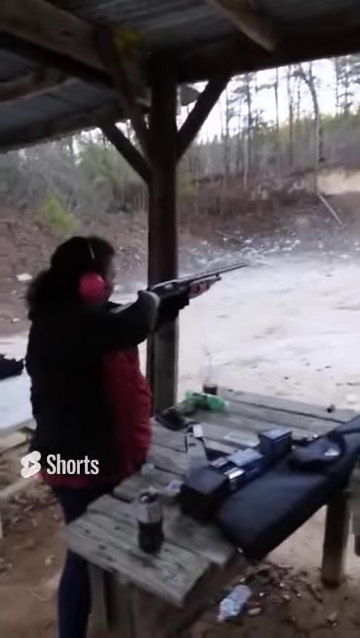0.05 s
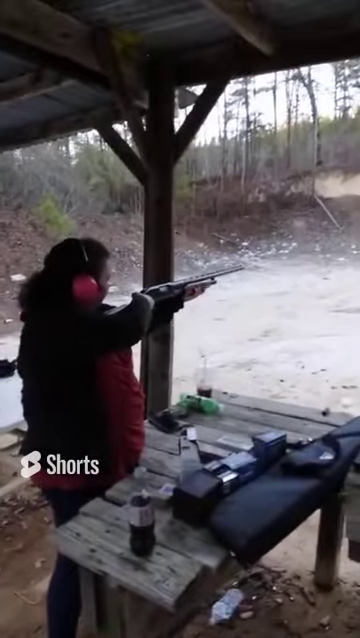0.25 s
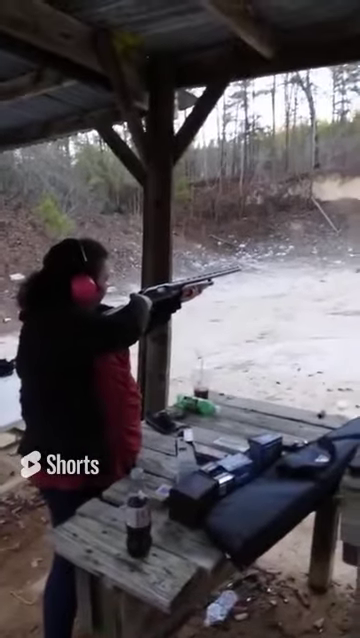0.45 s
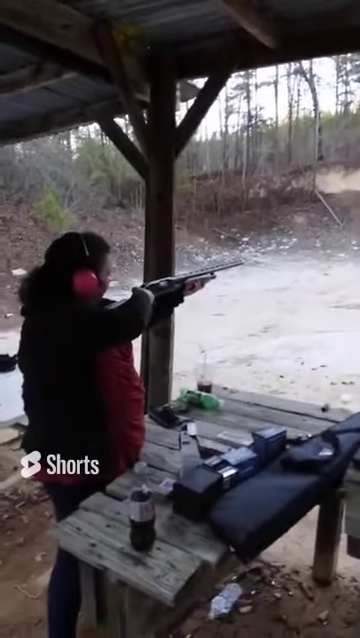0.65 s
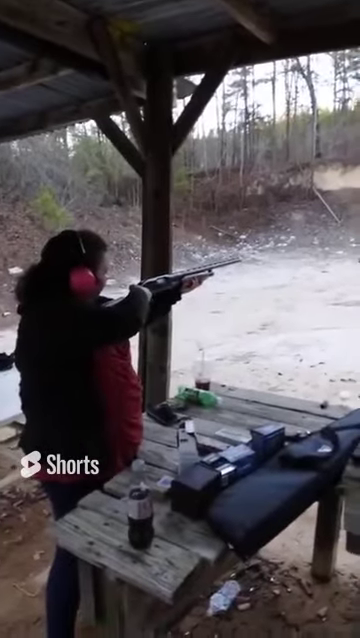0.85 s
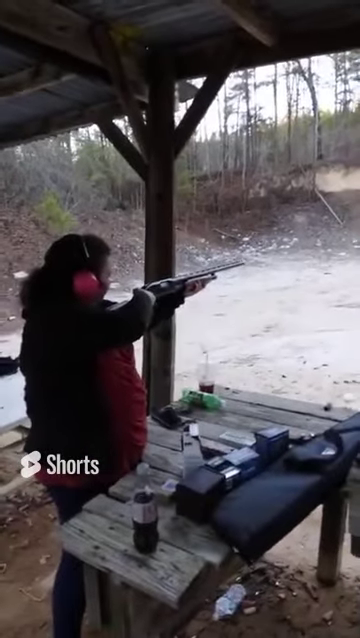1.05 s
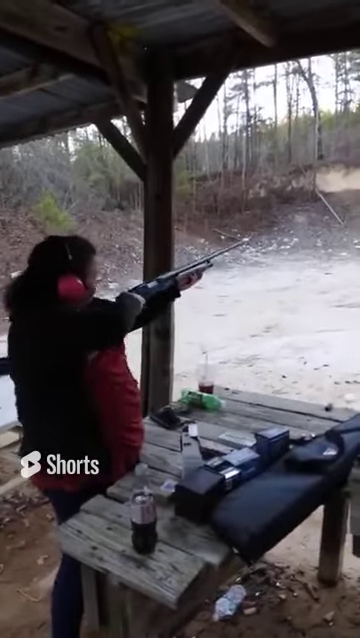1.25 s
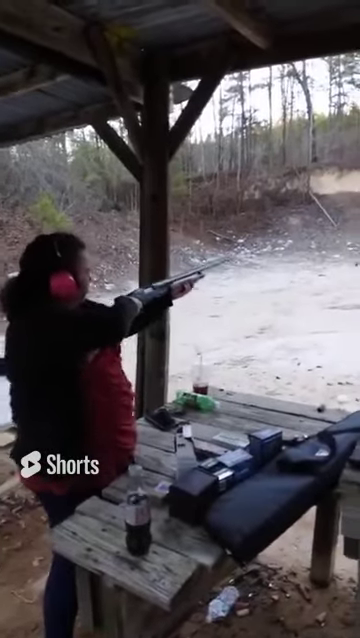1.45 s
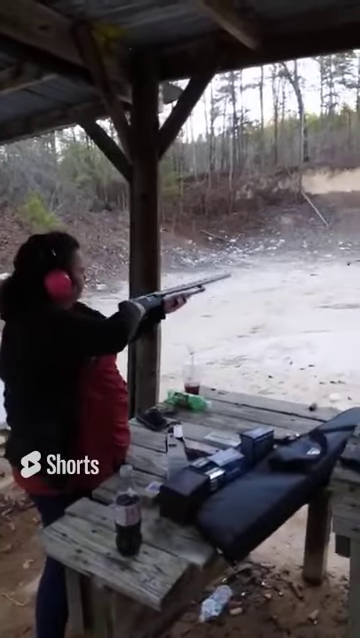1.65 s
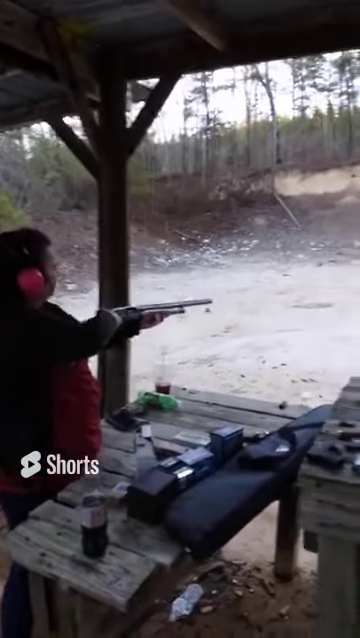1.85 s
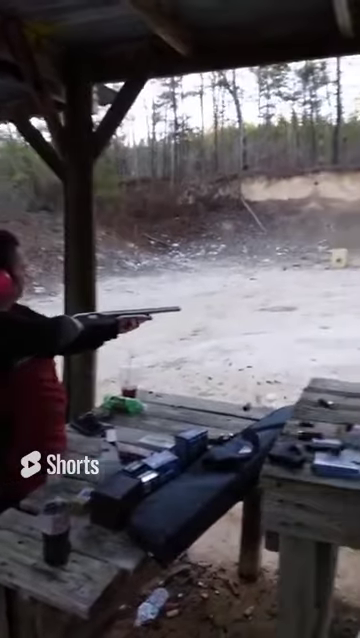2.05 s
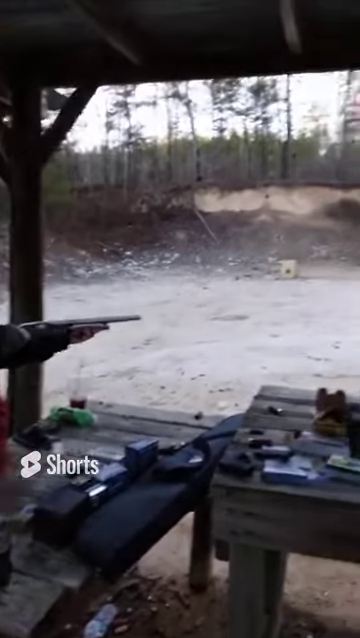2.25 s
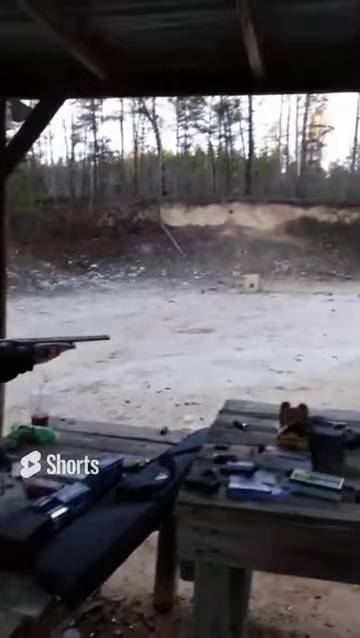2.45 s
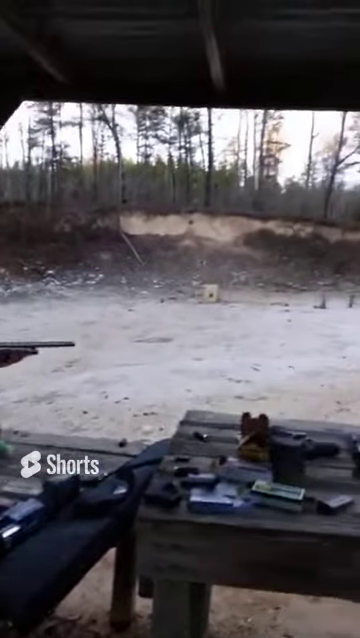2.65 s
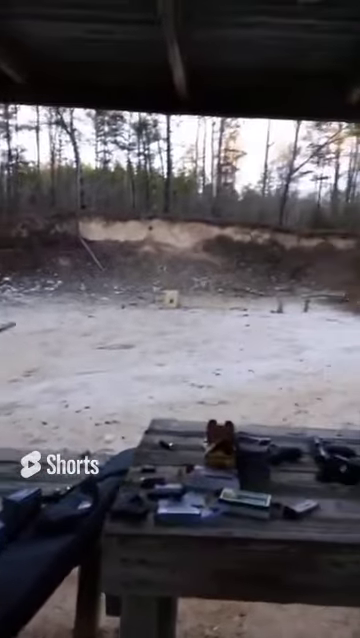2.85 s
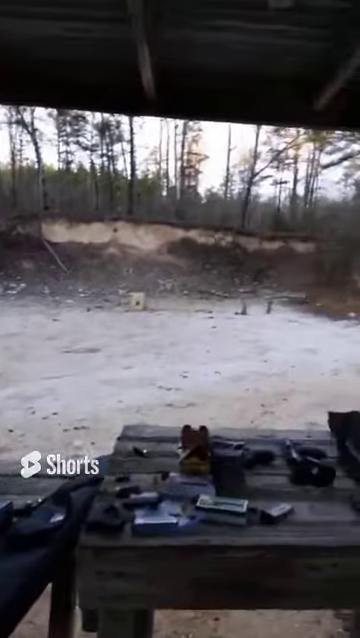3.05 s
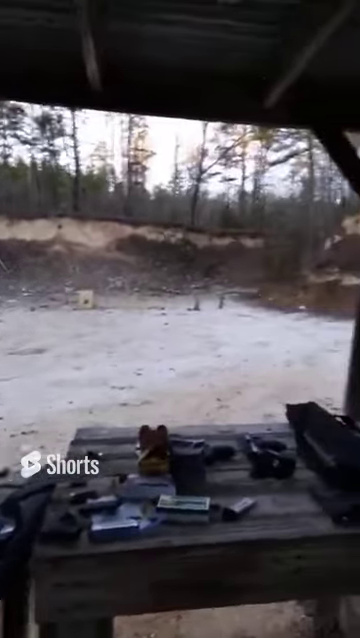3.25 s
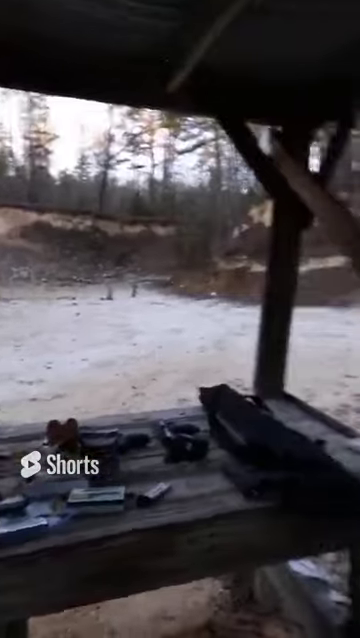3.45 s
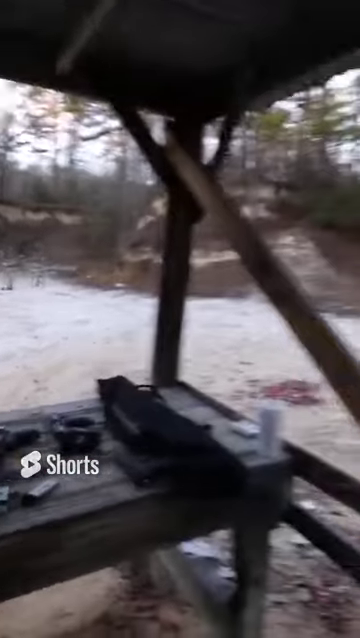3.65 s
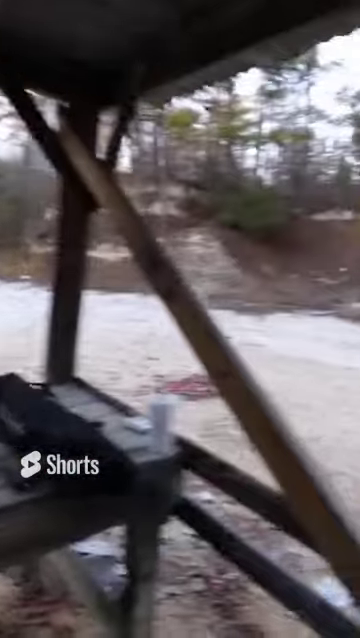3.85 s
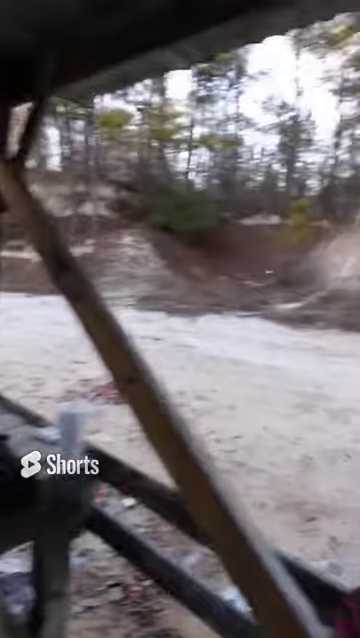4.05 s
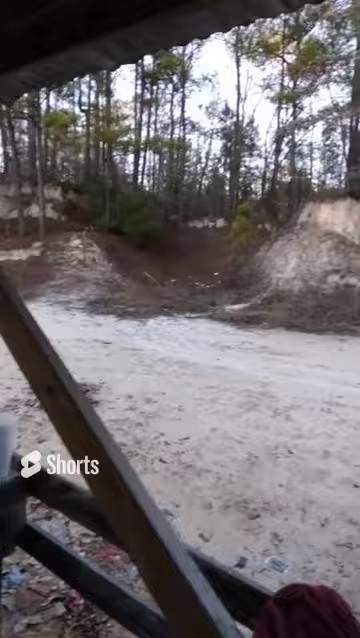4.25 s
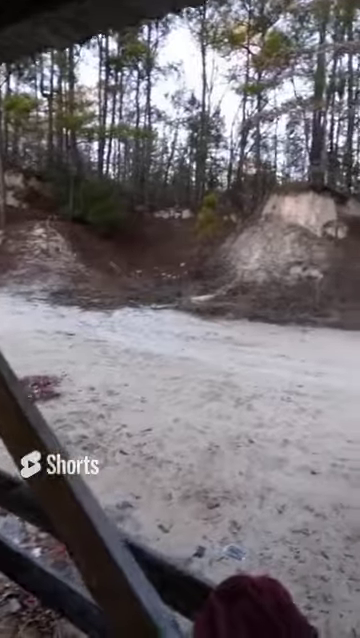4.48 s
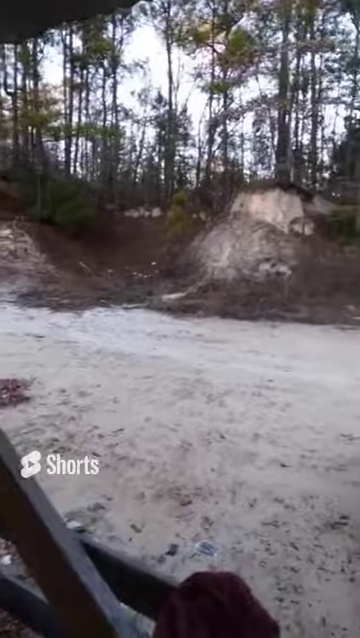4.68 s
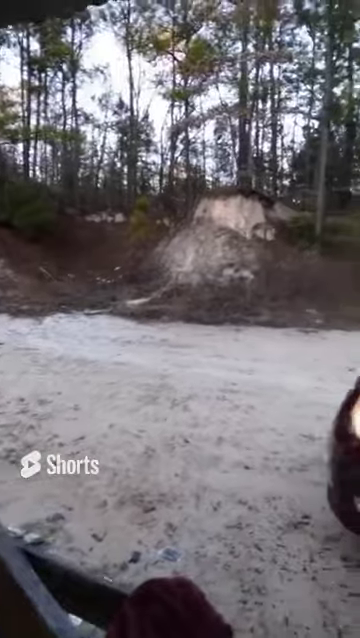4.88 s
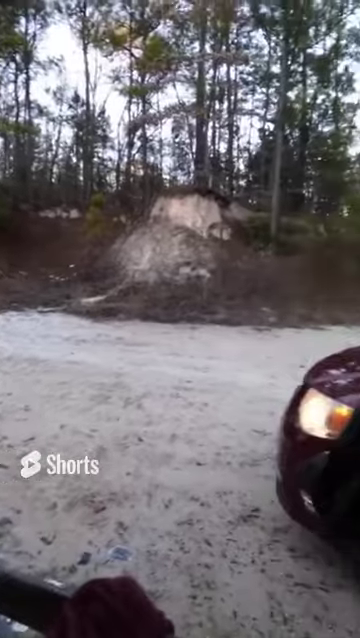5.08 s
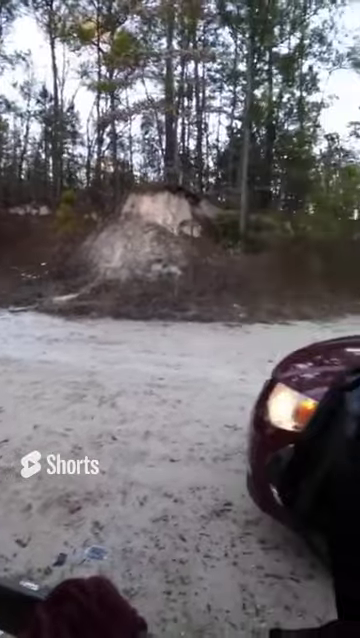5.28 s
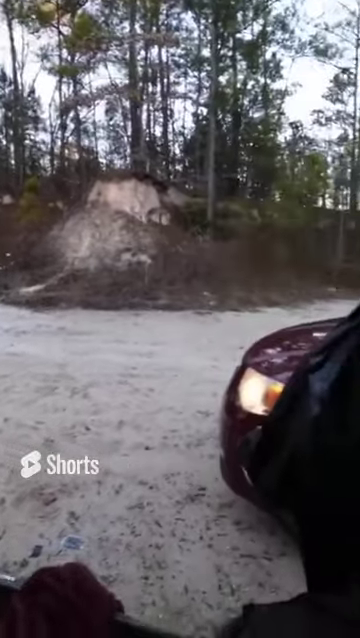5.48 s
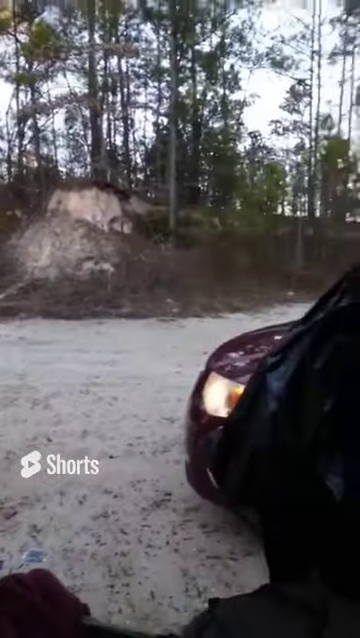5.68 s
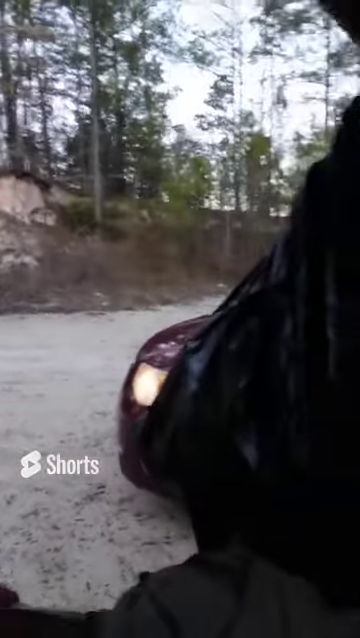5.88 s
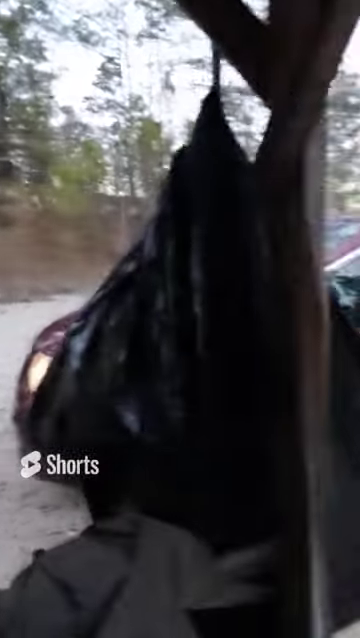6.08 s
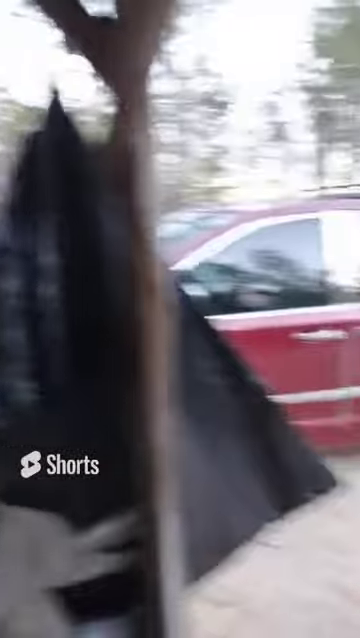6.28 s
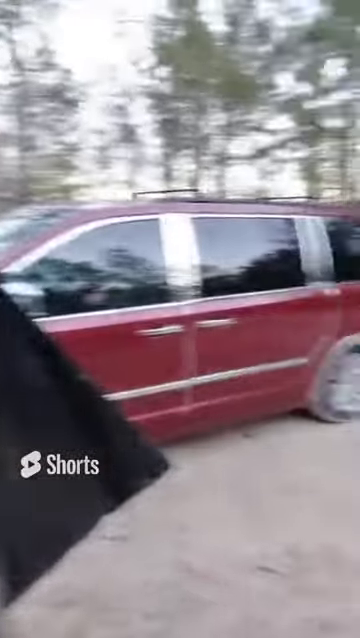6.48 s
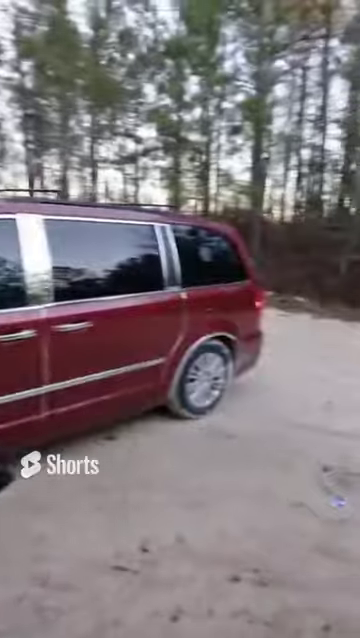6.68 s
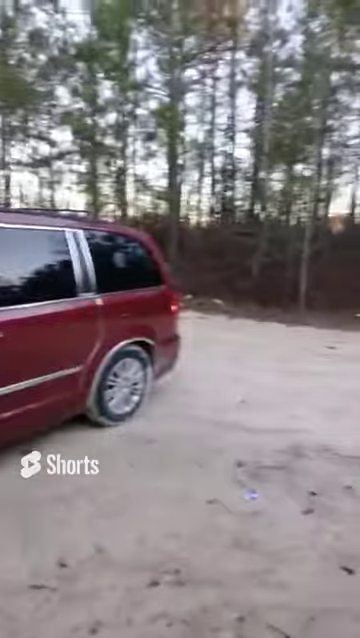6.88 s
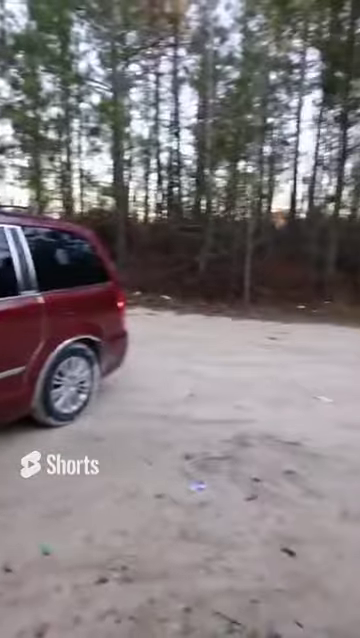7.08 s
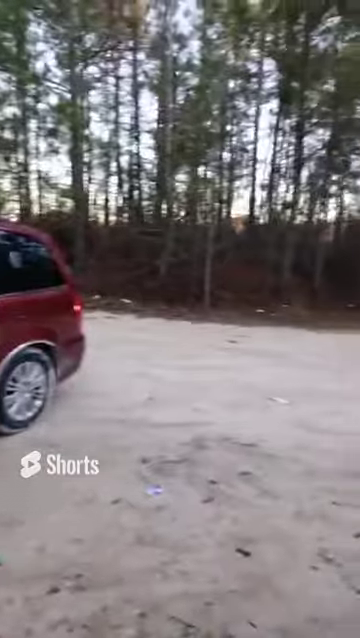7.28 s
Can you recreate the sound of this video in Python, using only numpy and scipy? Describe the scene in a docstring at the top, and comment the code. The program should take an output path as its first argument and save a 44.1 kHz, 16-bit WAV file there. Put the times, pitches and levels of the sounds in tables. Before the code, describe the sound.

The first second is quiet: low rumble, faint hum, dull wooden knocks near 0.5 and 0.6 s, and soft thuds of a hand on the left microphone, which sounds muffled. At 1.2 s a very close shotgun blast hits, overloading both sides with a booming crack; at about 1.4 s a hollow slap returns from the earth bank, with dense echoes and faint tin ringing that thin out towards 2.5 s. Through the tail the pump clacks back at 1.8 s with a rattle and forward at 2.1 s, with small ticks until 2.4 s. A bump falls at 2.3 s as the left side opens up. Wooden knocks come at 2.9 and 3.3 s, then crisp gear clicks at 4.3, 4.6, 4.9 and 5.2 s, stronger at 5.5 and, after a short scrape, 5.85 s. A van's low idle grows clearer, dips near 5.7 s, rises slightly at 6 s, and continues to the end with a faint knock at 6.6 s.

```python
"""Tin-roofed range shelter: one shotgun blast, thrown back by the earth bank and the pines.
Blast: pressure fronts, coloured noise washes and echoes, ringing roof modes. Overload clips both channels.
The pump is worked, then gear clicks, scrapes and rustles on a bench: noise chatter driving modes.
A van idles nearby: wavering sine orders over coloured noise, clearer as the camera turns to it.
A hand bumps and muffles the camera's left port, then slides off."""
import sys
import numpy as np
from scipy import signal
from scipy.fft import rfft, irfft, next_fast_len
from scipy.io import wavfile

SR = 44100
rng = np.random.default_rng(int(sys.argv[2]) if len(sys.argv) > 2 else 0)


def wav_out(sig):
    """Save sig, one row per channel (or a flat mono array), as 16-bit PCM at SR to the path in sys.argv[1]."""
    wavfile.write(sys.argv[1], SR, np.round(np.clip(np.atleast_2d(sig).T, -1, 1) * 32767).astype(np.int16))


N = 323253
TIME = np.arange(N) / SR
SHOT_S = 1.204  # muzzle wave arrives

# dull knocks on timber: t/s, level/dB, t60/s, level of the jolted gear/dB
KNOCKS = [(.459, -38, .24, -75), (.625, -44, .22, -61), (2.8585, -32.5, 0.047, -52.5),
          (2.977, -42, .03, -70), (3.3232, -28, 0.011, -55), (6.603, -39, 0.11, -64)]
# timber spectrum: f/Hz, relative density/dB
TIMBER = [(60, -22), (200, -1), (480, 1.5), (800, -8.5), (1400, -15), (3000, -30.5), (8000, -71)]


def amp(db):
    """Amplitude factor of a level in dB."""
    return 10 ** (np.asarray(db) / 20)


def evened(x):
    """Scales to rms 1."""
    return x / np.sqrt(np.mean(x ** 2) + 1e-20)


def read(points, hz):
    """Reads a spectrum table on a log-frequency axis."""
    f, value = np.transpose(points)
    return np.interp(np.log(hz + 1), np.log(f + 1), value)


def curve(rows, t=TIME):
    """Control curve at the times t."""
    return np.interp(t, *np.transpose(rows))


def add(mix, s, sound):
    """Mixes a sound in at s seconds."""
    part = mix[..., round(s * SR):][..., :sound.shape[-1]]
    part += sound[..., :part.shape[-1]]


def colour(x, points):
    """Minimum-phase filter with the given (Hz, dB) response."""
    size = 4096
    log_gain = np.log(amp(read(points, abs(np.fft.fftfreq(size, 1 / SR)))))
    taps = np.fft.ifft(np.exp(np.conj(signal.hilbert(log_gain)))).real
    taps = taps.reshape((1,) * (x.ndim - 1) + (-1,))
    return signal.oaconvolve(x, taps, axes=-1)[..., :x.shape[-1]]


def body(x, points):
    """Colours a white excitation and keeps its power."""
    power = np.mean(amp(read(points, np.linspace(0, SR / 2, 4096))) ** 2)
    return colour(x, points) / np.sqrt(power)


def ringing(x, modes):
    """Response of decaying sine modes (Hz, dB, t60) driven by x; impulse-response energy 1."""
    t = np.arange(SR) / SR
    ring = sum(amp(db - 60 * t / t60) * np.sin(2 * np.pi * hz * t) for hz, db, t60 in modes)
    return signal.fftconvolve(x, ring[None] / np.linalg.norm(ring), axes=1)[:, :N]


def grit(shape, spread_db):
    """Dense tiny impacts of very uneven size, rms 1."""
    size_db = spread_db * np.clip(rng.standard_normal(shape), -2, 2)
    return evened(rng.standard_normal(shape) * amp(size_db))


def drift(rate_hz):
    """Random wander of rms 1, rate_hz knots per second."""
    knots = rng.standard_normal(2048)
    return evened(np.interp(TIME * rate_hz, np.arange(len(knots)), knots))


def swell(start, end):
    """A level that rises and falls as half a sine."""
    return np.sin(np.pi * np.clip((TIME - start) / (end - start), 0, 1))


def during(start, end, edge_s):
    """1 between start and end, with soft edges."""
    return (np.tanh((TIME - start) / edge_s) - np.tanh((TIME - end) / edge_s)) / 2


def shock(width_s):
    """Blast wave: a jump in pressure, then suction."""
    u = np.arange(SR // 20) / SR / width_s
    return (1 - u) * np.exp(-u)


def blast():
    """Muzzle front, bank slap, noise washes (duller the later they arrive) and echoes, each with its own loss."""
    # scattered blast: f/Hz, relative density/dB
    blast_spectrum = [(20, -5.5), (60, -6), (130, 1.5), (220, 0), (330, -2.5), (520, 0.5), (850, -8),
                      (1500, -5.5), (3000, -8), (5000, -15), (8000, -22.5), (15000, -29)]
    # decay by band: f/Hz, factor on t60
    linger = [(60, .8), (200, 0.76), (550, 1.667), (2500, 0.99), (10000, 0.67)]
    # scatter off shelter and ground, bank, pines: t/s, level/dB, build-up/s, t60 before linger/s
    washes = [(1.199, -4.5, 0.022, 0.83), (1.396, -11, .025, 0.58), (1.41, -22, 0.16, 1.746)]
    # distinct slope echoes: t/s, level/dB, treble loss/(dB/kHz)
    echoes = [(1.314, -2, 6), (1.409, 0, 1.03), (1.45, -7, 16), (1.497, -6, 7)]
    bank_s, air_loss_db_per_khz_s = 1.414, 6  # wash loss per second of extra travel
    echo_build_s, echo_t60_s = .006, .105  # t60 before linger
    surge_db, surges_per_s, surge_below_hz = 2.5, 50, 700  # crossing echoes make the bass heave

    t, out = np.arange(0, 2.6, 1 / SR) + 1.15, np.zeros((2, N))
    size = next_fast_len(len(t))
    hz, centres = np.fft.rfftfreq(size, 1 / SR), np.geomspace(50, 14000, 10)
    field = rfft(body(grit((2, size), spread_db=5), blast_spectrum))
    paths = [(s, db, build, t60, air_loss_db_per_khz_s * (s - SHOT_S)) for s, db, build, t60 in washes]
    paths += [(s, db, echo_build_s, echo_t60_s, loss) for s, db, loss in echoes]
    s, db, build, t60, loss = np.transpose(paths)[:, :, None]
    age = np.maximum(t[::16] - s, 0)
    for centre, pick in zip(centres, np.eye(len(centres))):
        band = irfft(field * read(np.c_[centres, pick], hz), size)[:, :len(t)]
        surge = surge_db * (drift(surges_per_s)[:len(t)] - .4)
        band = band * amp(surge / (1 + (centre / surge_below_hz) ** 2))
        fall_db = 60 * age / (t60 * read(linger, centre)) + loss * centre / 1000
        path_levels = amp(db - fall_db) * (1 - np.exp(-age / build))
        envelope = np.linalg.norm(path_levels, axis=0)
        add(out, t[0], band * np.interp(t, t[::16], envelope))
    add(out, SHOT_S - .005, amp(-6.5) * shock(width_s=0.00094))  # sharp front, just ahead of the boom
    slap_response = [(100, -7), (450, -2), (590, 20), (750, -5), (1500, 3.5), (3500, -3.5), (9000, -21.5)]
    slap = colour(np.pad(shock(width_s=0.0006), (0, 2048)), slap_response)
    add(out, bank_s, amp(2.5) * slap)  # one rounded, hollow slap
    return out * amp(1.0 * drift(rate_hz=45))


def boom():
    """The wave shakes shelter and camera as damped sines; a noise crack forces past the hand."""
    # shelter and camera modes: f/Hz, left level/dB, right level/dB, t60/s
    boom_modes = [(239.3, 9, -18.5, 0.13), (410, 3, -20.5, .05), (50.6, 4.5, -16.5, 0.069),
                  (162, 2, -20, .11), (132.3, -17, -14.5, .7), (225, -23, -13.5, .45)]
    t, out = np.arange(SR) / SR, np.zeros((2, N))
    for hz, left_db, right_db, t60 in boom_modes:
        ring = np.sin(2 * np.pi * hz * t) * 1000 ** (-t / t60)
        add(out, SHOT_S, amp([[left_db], [right_db]]) * ring)
    crack_spectrum = [(100, 0.5), (700, 0), (2000, -14.5), (6000, -28.5), (14000, -45)]
    crack = body(grit(SR, spread_db=6), crack_spectrum)
    add(out[0], SHOT_S, amp(2) * crack * np.exp(-t / .016))
    return out


def hits(rows):
    """Each contact (s, dB, t60) is a fast-dying chatter of tiny impacts."""
    t, out = np.arange(SR // 3) / SR, np.zeros((2, N))
    for s, db, t60 in rows:
        envelope = 1000 ** (-t / t60) * (1 - np.exp(-t / 0.0015))
        add(out, s, amp(db) * grit((2, len(t)), spread_db=2.5) * envelope)
    return out * amp(2 * drift(rate_hz=250))  # parts rebound unevenly


def grains(level):
    """Clumped noise grains under a level curve, as in friction."""
    noise = grit((2, N), spread_db=5.5)
    return noise * level * amp(2.0 * drift(rate_hz=110))


def pump_action():
    """Back and forward slides end in stops, with rebounds where parts rattle; small parts tick."""
    # strokes: stop t/s, stop level/dB, slide length/s, slide level/dB, rattle length/s
    strokes = [(1.7802, -9.5, .04, -33.5, .03), (2.1201, -14.5, .035, -30, .005)]
    # latch, shell and carrier: t/s, level/dB
    ticks = [(1.648, -34), (1.9336, -37), (1.9493, -34.5), (2.0852, -30), (2.176, -41), (2.3545, -35.5),
             (2.4235, -43.5)]
    rebound_s, rebound_db, stop_t60_s, tick_t60_s = .0115, -1.5, .055, 0.064
    stops = []
    for s, db, _, _, rattle in strokes:
        for k in range(1 + int(rattle / rebound_s)):
            stops.append((s + k * rebound_s, db + k * rebound_db, stop_t60_s))
    slides = sum(amp(db) * during(s - length, s, edge_s=.008) for s, _, length, db, _ in strokes)
    return hits(stops + [(s, db, tick_t60_s) for s, db in ticks]) + grains(slides)


def bench_gear():
    """Gear clicks, each inside a short faint noise swell; one drag that catches unevenly, jolts, rustles."""
    # gear clicks: t/s, level/dB, t60/s
    clicks = [(3.0302, -49.5, 0.09), (4.3054, -29.5, 0.063), (4.5939, -34, 0.055), (4.923, -34.5, 0.066),
              (5.1902, -31.5, 0.051), (5.388, -59, .1), (5.5075, -20, 0.049), (5.8554, -19, 0.052),
              (5.877, -25.5, .07)]
    # sleeves and gear, before flutter: start t/s, end t/s, level/dB
    rustle_rows = [(1.886, 2.134, -49), (2.162, 2.502, -61), (2.998, 3.06, -62), (3.45, 3.723, -63.5),
                   (3.76, 4.014, -71), (4.189, 4.417, -63), (5.905, 6.356, -69.5), (6.299, 6.5, -58.5),
                   (6.576, 6.75, -60.5), (6.78, 6.868, -70), (7.21, 7.289, -69)]
    pre_lead_s, pre_db, pre_t60_s = .02, -21, 0.034  # fainter click ahead of each; dB re click
    halo_lead_s, halo_trail_s = 0.031, 0.047
    halo_db, halo_follow = -38, 0.52  # offset; share of the click's dB added
    drag_start_s, drag_end_s, drag_db, drag_edge_s = 5.708, 5.87, -42, 0.02
    catches_per_s, catch_db, catch_spread_db, catch_t60_s = 42, -30, 4, .036
    flutter_db, flutters_per_s = 3, 34

    pre_clicks = [(s - pre_lead_s, db + pre_db, pre_t60_s) for s, db, _ in clicks]
    jolts = [(s, jolt_db, t60) for s, _, t60, jolt_db in KNOCKS]
    halos = sum(amp(halo_db + halo_follow * db) * swell(s - halo_lead_s, s + halo_trail_s)
                for s, db, _ in clicks)
    period_s = 1 / catches_per_s
    starts = np.arange(drag_start_s, drag_end_s - period_s, period_s)
    catches = [(s + .5 * late * period_s, catch_db + catch_spread_db * (2 * force - 1), catch_t60_s)
               for s, (late, force) in zip(starts, rng.random(size=(32, 2)))]
    drag = amp(drag_db) * during(drag_start_s, drag_end_s, drag_edge_s)
    rustles = sum(amp(db) * swell(start, end) for start, end, db in rustle_rows)
    rustles = rustles * amp(flutter_db * drift(flutters_per_s))
    return hits(clicks + pre_clicks + catches + jolts) + grains(halos + drag + rustles)


def handling():
    """Contacts and friction sound the gun's steel, the gear and the timber."""
    # gun spectrum: f/Hz, relative density/dB
    steel_spectrum = [(100, -27.5), (400, -14), (1000, -4), (1800, -1), (3200, 0), (4500, -1), (6000, -3.5),
                      (8000, -9), (11000, -7.5), (13000, -16.5), (15500, -18.5)]
    # receiver and barrel: f/Hz, relative level/dB, t60/s
    steel_modes = [(2750, -8.5, 0.2), (3180, 4, 0.13), (3330, -8, 0.11), (4250, -7, 0.18),
                   (4560, -1, 0.0704), (5540, -11, 0.061), (7160, -8, 0.085), (7892, -7, 0.07)]
    # gear spectrum: f/Hz, relative density/dB
    gear_spectrum = [(150, -34), (600, -9.5), (1400, -5.5), (2200, 1.5), (3200, 2), (4500, -5), (7000, -12),
                     (9000, -11), (11500, -14.5), (13000, -15), (15500, -20)]
    # gear modes: f/Hz, relative level/dB, t60/s
    gear_modes = [(2120, 3.5, 0.14), (2480, 8, 0.036), (2870, 7.5, 0.028), (3575, -14, 0.042),
                  (5450, -24, 0.049), (7800, -12, .04)]
    # bench boards: f/Hz, relative level/dB, t60/s
    board_modes = [(355, 2.5, 0.094), (494, -0.5, 0.086), (551, -5, 0.077), (682, 3.5, .07)]
    pump, gear, knocks = pump_action(), bench_gear(), hits([row[:3] for row in KNOCKS])
    steel = body(pump, steel_spectrum) + amp(-13.5) * ringing(pump, steel_modes)
    bench = body(gear, gear_spectrum) + amp(-14) * ringing(gear, gear_modes)
    timber = amp(-3.5) * body(knocks, TIMBER) + amp(-6.5) * ringing(knocks, board_modes)
    timber += amp(-19) * body(gear, TIMBER)  # boards under the gear
    return steel + bench + timber


def shelter(x):
    """Roof, posts and benches return a short, thin noise tail."""
    t = np.arange(SR // 3) / SR
    tail = grit((2, len(t)), spread_db=4.5) * np.exp(-t / 0.024) * (t > .004)
    tail = colour(tail / np.linalg.norm(tail[0]), [(300, -5.5), (3000, -12.5), (12000, -20)])
    return x + signal.oaconvolve(x, tail, axes=1)[:, :N]


def bumps():
    """A finger pushes a short, heavily damped swing of air into the left port."""
    # bumps: t/s, swing level before damping/dB, f/Hz
    bump_rows = [(.053, -28, 300), (.15, -27, 249), (0.5938, -18, 271), (1.028, -24, 288), (1.18, -29, 252),
                 (2.3283, -13, 175), (2.721, -20.5, 168), (3.924, -27, 250)]
    t, out = np.arange(SR // 10) / SR, np.zeros((2, N))
    for s, db, hz in bump_rows:
        swing = np.sin(2 * np.pi * hz * t) * np.exp(-hz * t / .7)
        tick = 0.11 * np.sin(2 * np.pi * 800 * t) * np.exp(-t / 0.0024)
        add(out[0], s, amp(db) * (swing + tick) * (1 - np.exp(-t / .00014)))
    return out


def cover(t):
    """Share of the left port under the hand, which slides off exponentially."""
    lift_s, lift_fade_s = 2.1, 0.31
    return np.exp(-np.maximum(t - lift_s, 0) / lift_fade_s)


def rumble():
    """Low noise: the carried camera sways in both ports, the resting hand sounds in the left."""
    # sways: t/s, level/dB
    sways = [(2.25, -40), (3.88, -44.5), (5.1, -45), (5.44, -41), (6.63, -41), (6.85, -40.5)]
    sway_s = .08  # Gaussian width
    sway = sum(amp(db) * np.exp(-((TIME - s) / sway_s) ** 2) for s, db in sways)
    sway_response = [(25, -10), (55, -2.5), (100, -5.5), (170, -21.5), (500, -58), (3000, -110)]
    out = np.tile(sway * evened(colour(rng.standard_normal(N), sway_response)), (2, 1))
    hand_response = [(20, 2.5), (60, -8.5), (150, -23.5), (600, -60), (3000, -100)]
    hand = evened(colour(rng.standard_normal(N), hand_response))
    add(out[0], 0, amp(-36.5) * cover(TIME) * hand)
    return out


def ports(x):
    """Ports resonate near 10 kHz; the left is duller, and muffled while the hand lies on it."""
    # left re right port: f/Hz, gain/dB
    left_port = [(100, 0), (400, 1.5), (1200, -0.5), (3000, -2.5), (6000, -9), (10000, -17), (15000, -5.5)]
    # under the full hand: f/Hz, gain/dB
    muffle = [(60, 2.5), (150, -1), (300, -9.5), (600, -21), (1200, -21.5), (3000, -23), (6000, -26),
              (11000, -27)]
    left, right = colour(x, [(7500, 3), (9000, 4.5), (10200, 12.5), (11500, 2.5), (13000, -5)])
    hz, t, z = signal.stft(colour(left, left_port), SR, nperseg=512)
    z = z * amp(read(muffle, hz)[:, None] * cover(t))
    return np.array([signal.istft(z, SR, nperseg=512)[1][:N], right])


def turned(t):
    """How far the camera faces the van: 0 away, 1 facing."""
    start_s, end_s, facing_before, facing_after = 1.2, 4.3, .04, .93
    return np.interp(t, [start_s, end_s], [facing_before, facing_after])


def van():
    """Wavering sine engine orders and a low hum over noise for fan and outdoor rumble."""
    # idle: t/s, firing rate/Hz
    idle = [(2.6, 31.07), (3.26, 31.52), (5.13, 30.96), (5.73, 28.7), (6.04, 32.76), (6.33, 32.9),
            (7.33, 30.63)]
    # engine orders, before shading and sag: multiple of firing rate, level/dB
    orders = [(1, -45), (2, -49.5), (3, -62), (4, -56), (5, -64), (6, -54), (7, -46.5), (10, -61.5)]
    # shading, scaled by facing: f/Hz, gain/dB
    shade = [(30, -4.5), (60, -2.5), (130, -2.5), (220, -7.5), (350, -2.5), (750, -2), (1500, -13.5),
             (4000, -5.5), (9000, 1)]
    # fan and outdoor bed: f/Hz, relative density/dB
    air = [(20, -2), (60, -2.5), (120, -6), (200, -12), (320, -10), (480, -17), (1000, -19.5), (1500, -29),
           (2500, -38), (4500, -56), (8000, -68), (15000, -76)]
    # left-right likeness: f/Hz, correlation
    same_points = [(60, 0.83), (180, 0.9), (550, 0.55), (1650, 0.28), (4970, -0.025), (15000, -0.01)]
    air_db, sag_db_per_hz = -49.5, 2.5  # hum weakens below the starting rate
    drone_hz, drone_db, drone_end_s, drone_fade_s = 42.4, -44, 2.35, .08  # second low hum

    rate_hz, start_hz = curve(idle), idle[0][1]
    turns = np.cumsum(rate_hz) / SR
    facing = turned(TIME)
    hum = np.zeros(N)
    for k, db in orders:
        order_db = db + 2.8 * drift(rate_hz=4.4) + (2 - facing) * read(shade, k * start_hz)
        hum += amp(order_db) * np.sin(2 * np.pi * (k * turns + rng.random()))
    hum *= amp(sag_db_per_hz * np.minimum(rate_hz - start_hz, 0))
    drone = amp(drone_db + 1.5 * drift(rate_hz=3.2)) * np.sin(2 * np.pi * drone_hz * TIME)
    hum += drone * during(-1, drone_end_s, drone_fade_s)

    hz, t, (a, b) = signal.stft(rng.standard_normal((2, N)), SR, nperseg=2048)
    same = np.clip(read(same_points, hz), -1, 1)[:, None]
    # gusts swell mainly the rumble
    gust_db = 1.7 * np.interp(t, TIME, drift(rate_hz=8.7)) / (1 + (hz[:, None] / 130) ** 2)
    level_db = read(air, hz)[:, None] + gust_db + read(shade, hz)[:, None] * (1 - turned(t))
    z = np.array([a, same * a + np.sqrt(1 - same ** 2) * b]) * amp(level_db)
    bed = evened(signal.istft(z, SR, nperseg=2048)[1][:, :N])
    return hum + amp(air_db) * bed


def scene():
    """Airborne sound passes the ports; boom, bumps and rumble bypass them."""
    # ringing tin sheets: f/Hz, relative level/dB, t60/s
    roof_modes = [(439.5, -4, 0.99), (578, -1.5, 0.64), (1006, -6, .6), (1154, -2, .45), (1288, -4.5, 0.65),
                  (1343, -8.5, 0.73)]
    shot = blast()
    roof = amp(-32.0) * ringing(shot, roof_modes)
    airborne = shot + roof + shelter(handling()) + van()
    return ports(airborne) + boom() + bumps() + rumble()


def record(dry):
    """Faint self-noise, overload at full scale, then the band limit."""
    edge_hz = 15650
    noisy = dry + amp(-96) * rng.standard_normal(dry.shape)
    clipped = noisy / (1 + noisy ** 8) ** (1 / 8)
    lowpass = signal.firwin(255, edge_hz, window=("kaiser", 8), fs=SR)
    return signal.oaconvolve(clipped, lowpass[None], "same")


dry = scene()
out = record(dry)
wav_out(out)
```